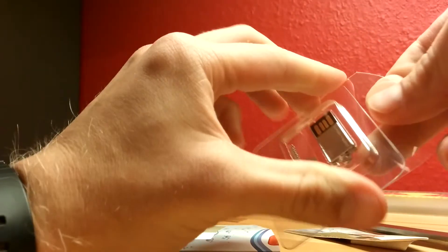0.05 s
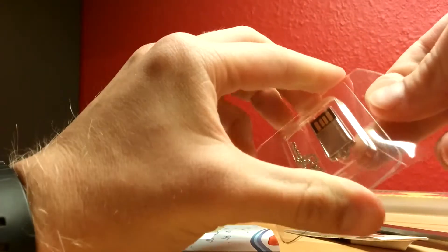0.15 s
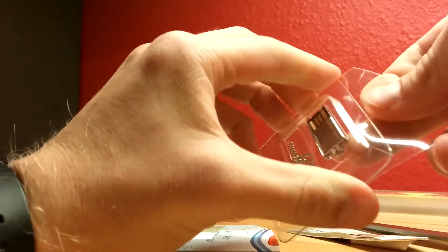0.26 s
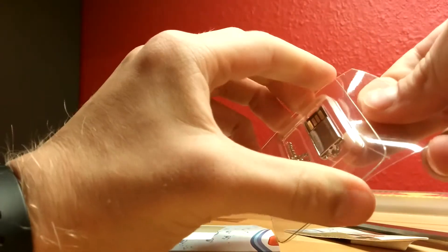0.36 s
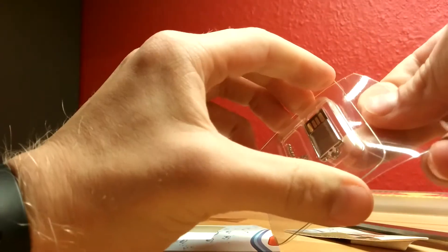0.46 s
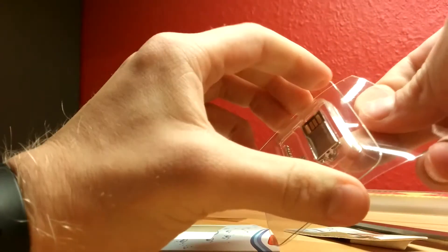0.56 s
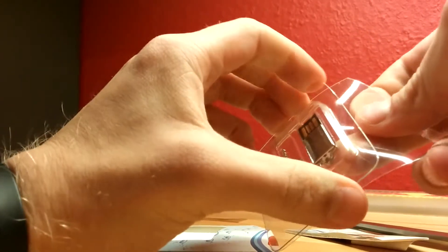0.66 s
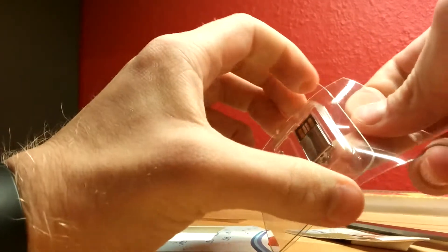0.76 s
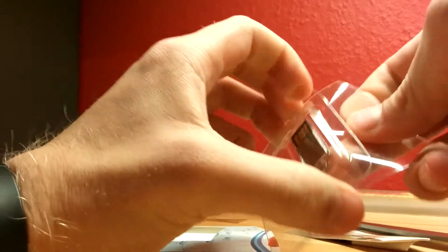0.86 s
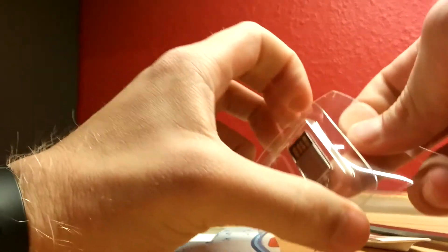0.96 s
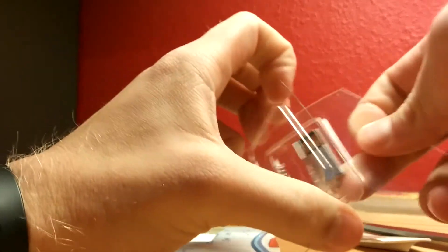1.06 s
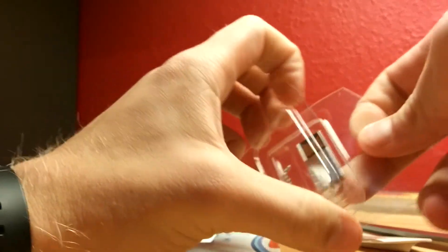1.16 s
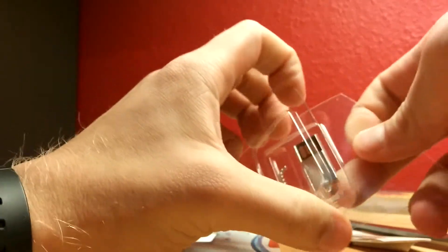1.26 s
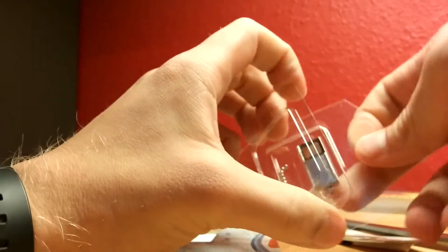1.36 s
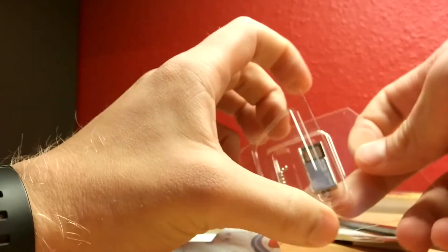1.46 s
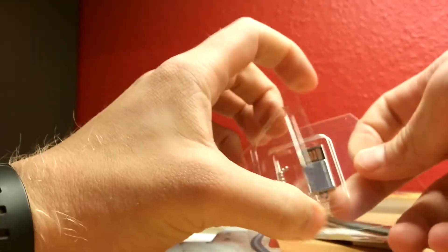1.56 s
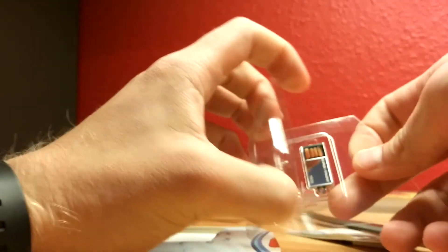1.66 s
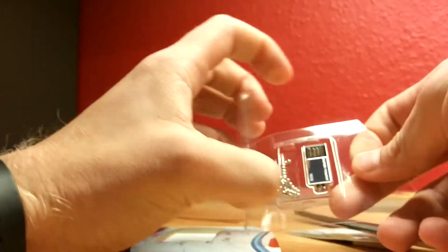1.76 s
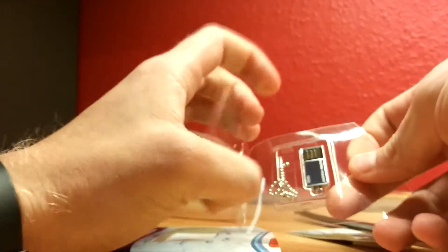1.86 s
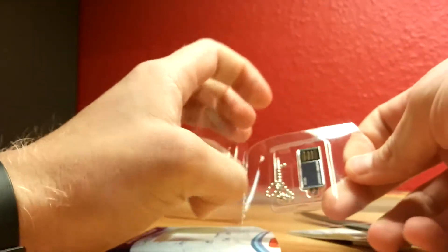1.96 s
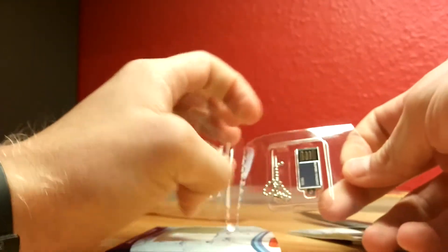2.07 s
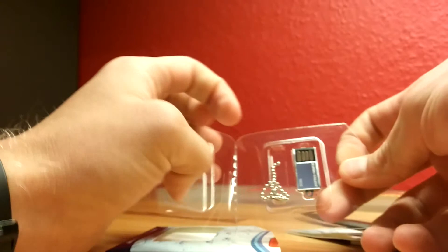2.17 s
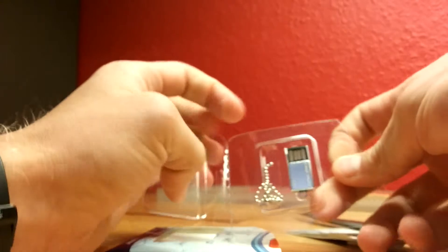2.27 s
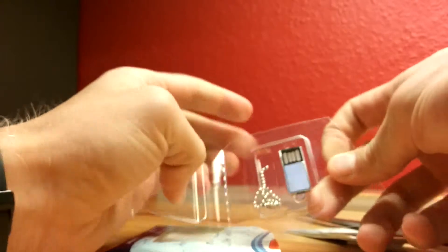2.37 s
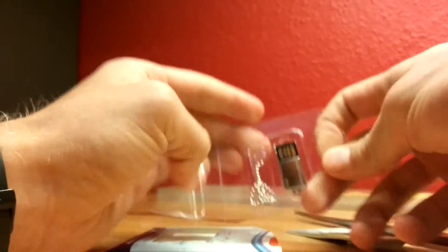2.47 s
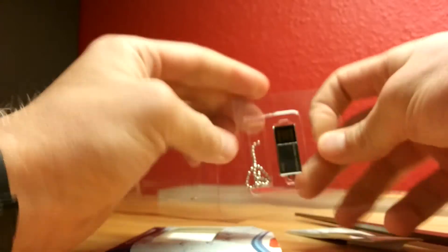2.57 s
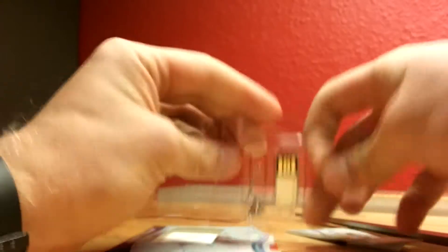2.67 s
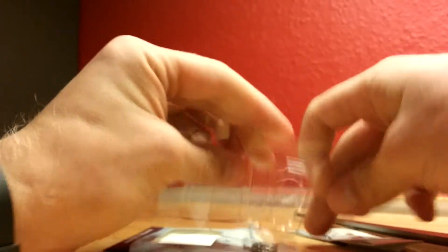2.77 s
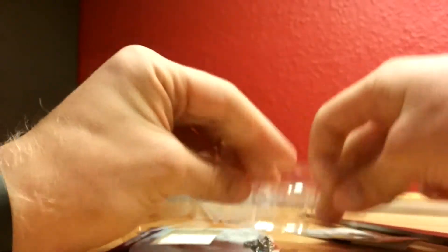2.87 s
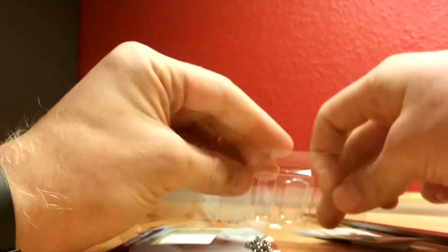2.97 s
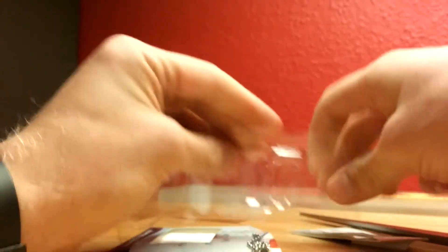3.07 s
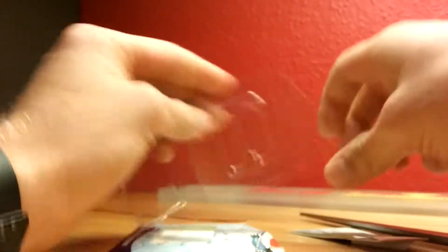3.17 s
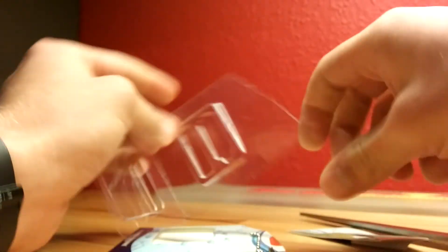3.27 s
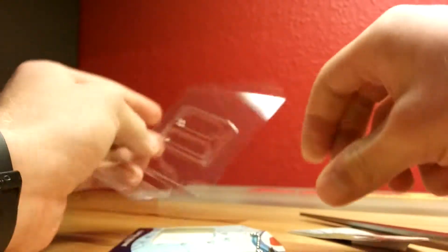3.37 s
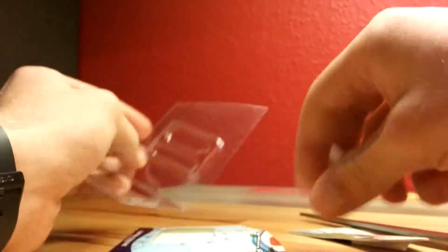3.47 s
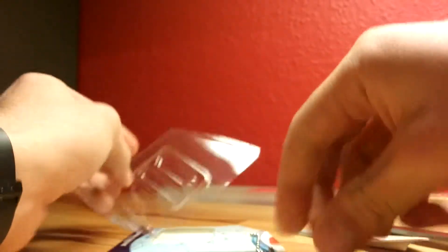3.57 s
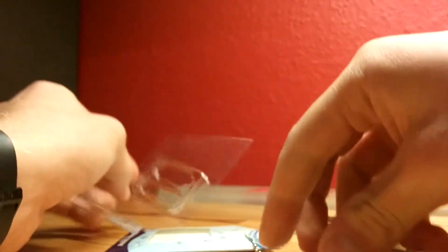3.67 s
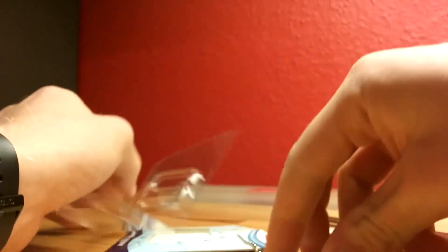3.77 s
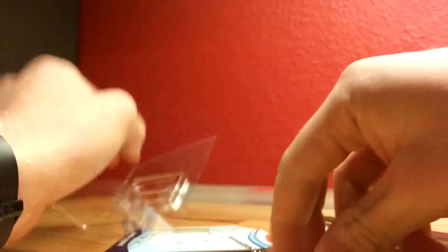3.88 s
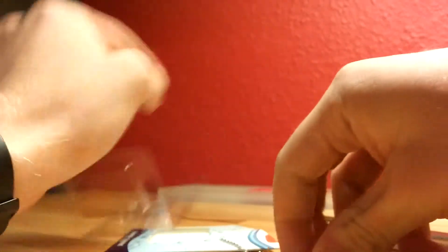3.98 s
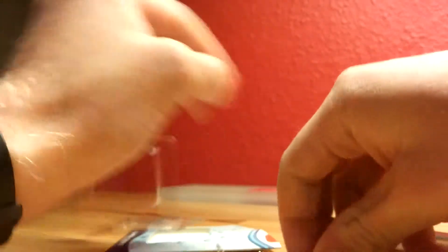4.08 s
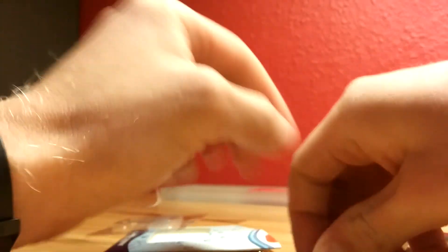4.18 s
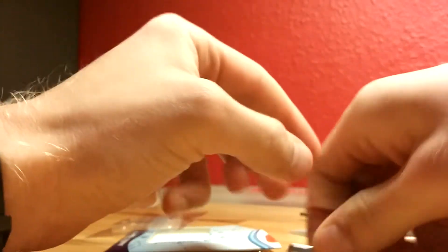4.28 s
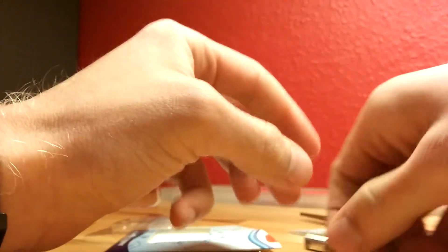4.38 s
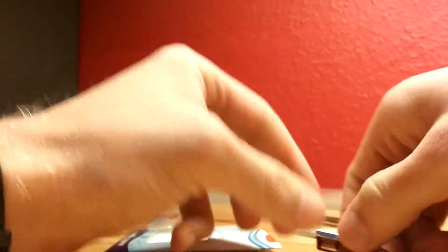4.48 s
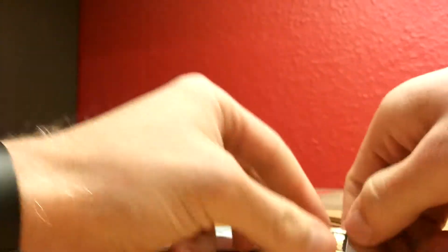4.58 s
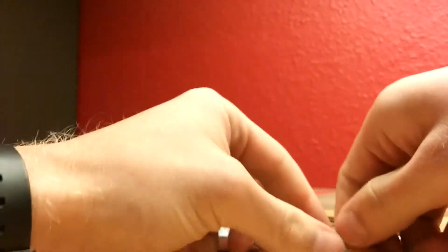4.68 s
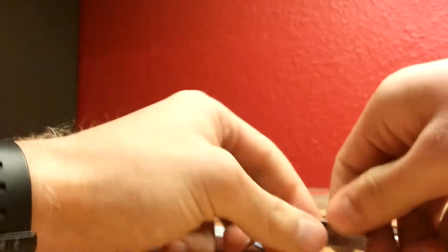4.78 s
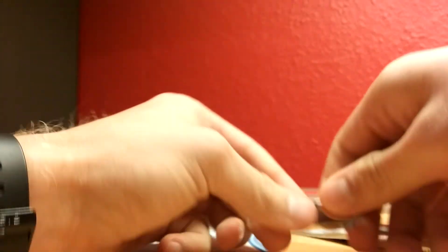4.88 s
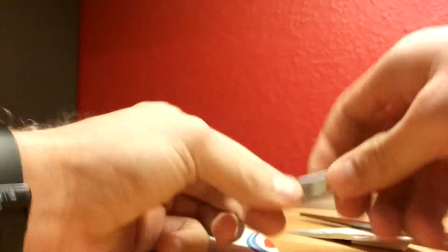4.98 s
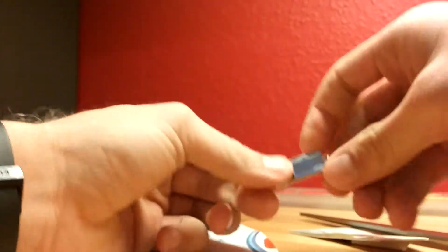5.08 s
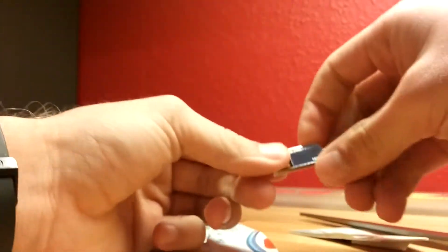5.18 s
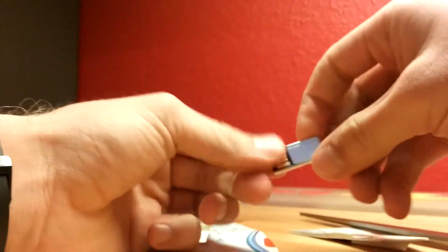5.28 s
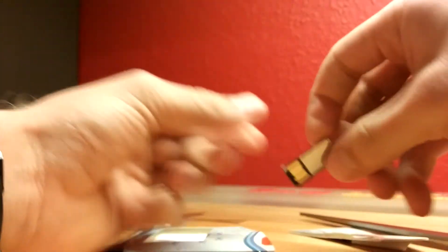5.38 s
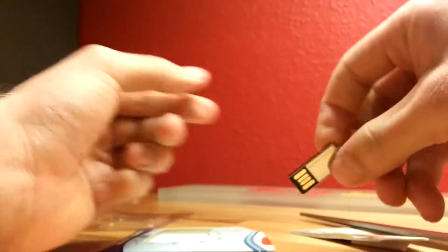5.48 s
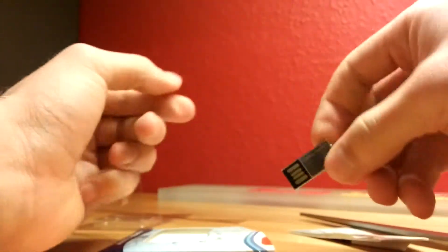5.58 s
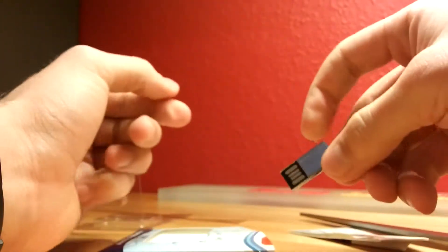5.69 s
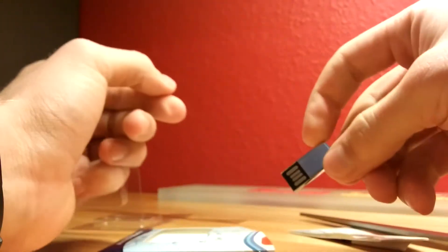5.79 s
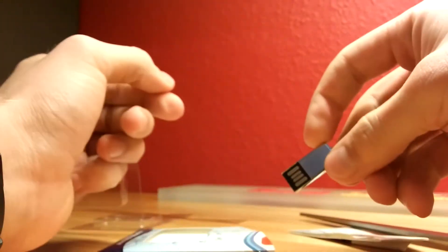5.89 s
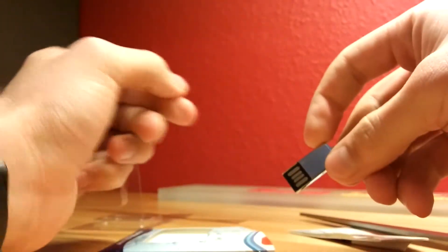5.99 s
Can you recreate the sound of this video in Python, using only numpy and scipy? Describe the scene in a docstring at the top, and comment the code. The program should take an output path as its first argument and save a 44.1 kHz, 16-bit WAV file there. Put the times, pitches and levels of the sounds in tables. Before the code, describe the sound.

Two hands pry open a stiff plastic blister pack at a desk in a small, quiet room. It gives way in separate bursts of sharp snaps and short scrapes, with a few dull knocks on the desk top. Midway comes the loudest, densest crackling, with a hollow ring from the shell. Lighter clicks and scrapes follow, then a pause, one last crackle and a brief, faint low hum. It sounds close, over faint air hiss.

```python
"""At a desk in a small, quiet room, two hands pry open a plastic blister pack, free an object, drop the pack.
The stiff plastic buckles in snaps: runs of tiny clicks that ring one flat patch and the hollow shell.
It scrapes as it sticks and slips, and a few dull knocks set the desk top ringing.
Behind it all is a faint hiss of air, and a low hum that swells once near the end."""
import sys
import numpy as np
from scipy import signal
from scipy.fft import rfft, irfft
from scipy.io import wavfile

SR = 44100
rng = np.random.default_rng(int(sys.argv[2]) if len(sys.argv) > 2 else 0)


def int16_out(signal):
    """Quantize to a 16-bit WAV file."""
    q = np.round(np.clip(np.atleast_2d(signal).T, -1, 1) * 32767)
    wavfile.write(sys.argv[1], SR, q.astype(np.int16))


N = 266229


def gain(db):
    """Turn decibels into a number to multiply by."""
    return 10 ** (np.asarray(db) / 20)


def unit(x):
    """Scale a sound so that its total energy is 1."""
    return x / np.sqrt(np.sum(x ** 2) + 1e-18)


def level_curve(points):
    """Join (time [s], level [dB]) points with straight lines."""
    times, levels_db = np.transpose(points)
    return np.interp(np.arange(N) / SR, times, levels_db)


def fade(t, t60):
    """Die away by 60 dB every t60 seconds."""
    return np.exp(-np.log(1000) * t / t60)


def add(out, start_s, x):
    """Mix x into out from the given time on."""
    i = max(int(start_s * SR), 0)
    out[i:i + len(x)] += x[:max(len(out) - i, 0)]


def colour(x, points, size=2048):
    """Shape the bass and treble along (frequency [Hz], level [dB]) points."""
    hz, db = np.transpose(points)
    grid_hz = np.maximum(np.arange(size // 2 + 1) * SR / size, 1)
    gains = gain(np.interp(np.log(grid_hz), np.log(hz), db))
    # folding the cepstrum makes a filter that rings only after a click, never before it
    cepstrum = irfft(np.log(gains))
    cepstrum[1:size // 2] *= 2
    cepstrum[size // 2 + 1:] = 0
    response = irfft(np.exp(rfft(cepstrum)))
    return signal.fftconvolve(x, response)[:len(x)]


def resonance(x, hz, width_hz):
    """Keep the sound near one pitch; a narrower band rings longer."""
    return signal.lfilter(*signal.iirpeak(min(hz, SR * .45), hz / width_hz, fs=SR), x)


def noise(points):
    """Steady noise with an average power of 1, shaped as in colour()."""
    return unit(colour(rng.standard_normal(N), points)) * np.sqrt(N)


# the tone of the room's air: (frequency [Hz], relative level [dB])
AIR_TONE = [(15, -39.5), (25, -7.5), (102, -5), (134, -9.5), (363, -15), (516, -14), (988, -18),
            (1100, -19), (2910, -20), (16000, -25)]


def air(level_db=-72):
    """The faint, steady rumble and hiss of a quiet room."""
    return gain(level_db) * noise(AIR_TONE)


# how the hum rises and falls: (time [s], level [dB])
HUM_SWELL = [(4.9, -85), (5.3, -78), (5.74, -68.5), (5.81, -54.5), (5.86, -46.5), (5.895, -55.5),
             (5.925, -78)]


def hum(pitch_hz=100, hiss_db=-9):
    """A low tone and a soft hiss swell together."""
    tone = np.sqrt(2) * np.sin(2 * np.pi * pitch_hz * np.arange(N) / SR)
    hiss = noise([(25, 0), (60, 17.5), (200, 13), (500, 6), (2000, -0.5), (10000, -4), (16000, -5.5)])
    return gain(level_curve(HUM_SWELL)) * (tone + gain(hiss_db) * hiss)


def room(x, echo_db=-16, first_echo_s=0.0081, t60=0.12, size=8000):
    """Add quick echoes from the desk and the near wall."""
    t = np.arange(size) / SR
    echoes = unit(rng.standard_normal(size) * fade(t, t60) * (t > first_echo_s))
    echoes = colour(echoes, [(100, 2), (700, -3), (4000, 1.5), (15000, -2)])
    return x + gain(echo_db) * signal.fftconvolve(x, echoes)[:N]


# the notes the desk top rings at: (pitch [Hz], relative level [dB], time to fade by 60 dB [s])
DESK_NOTES = [(57.1, -19, 0.12), (88, -22, 0.12), (173, -21.5, 0.13), (226, -9.5, 0.037), (290, 3, 0.029),
              (371.2, 1.5, 0.036), (429, -5.5, 0.12), (533, -6, 0.2), (720, -11, .03)]
# hand and pack bumping the desk: (time [s], relative level [dB], contact time [s])
DESK_KNOCKS = [(1.127, -19, 0.0024), (1.928, -16, 0.0027), (2.263, -22.5, 0.0018), (2.774, -28.5, 0.0023),
               (2.887, -14.5, 0.00074), (3.3175, -15.5, 0.00062), (3.416, -21, 0.0023),
               (4.704, -51.5, 0.003)]


def desk_knocks(level_db=-5, size=8000):
    """Soft pushes ring the desk top; a longer contact sounds duller."""
    out, t = np.zeros(N), np.arange(size) / SR
    ring = sum(gain(db) * np.sin(2 * np.pi * hz * t) * fade(t, t60) for hz, db, t60 in DESK_NOTES)
    for start_s, db, contact_s in DESK_KNOCKS:
        push = np.sin(np.pi * np.minimum(t / contact_s, 1))
        knock = signal.fftconvolve(ring, push / push.sum())[:size]
        add(out, start_s, gain(db + level_db) * knock)
    return out


# the notes the hollow shell rings at: (pitch [Hz], band width [Hz], relative level [dB])
SHELL_NOTES = [(306, 12, 10), (485, 41, 6), (678.5, 18, 9), (1020, 17, -5.5), (1210, 18, -2.5),
               (1364, 45, -3), (1960, 38, -1), (2770, 150, -9.5), (3330, 260, -5), (4050, 570, -7.5),
               (4600, 320, -6), (5200, 170, -14.5)]
# how freely it rings; fingers muffle it until the halves part: (time [s], level [dB])
SHELL_FREEDOM = [(2.75, -27), (2.9, 0), (3.02, 1), (3.14, -2.5), (3.24, -19.5)]


def shell(x, opens_s=1.5, taut_db=-1):
    """The tight, closed pack rings high; the hollow shell adds its notes as far as the fingers let it."""
    closed = np.arange(N) / SR < opens_s
    taut_ring = gain(taut_db) * resonance(x * closed, hz=3290, width_hz=100)
    shaking = x * gain(level_curve(SHELL_FREEDOM))
    hollow_ring = sum(gain(db) * resonance(shaking, hz, width) for hz, width, db in SHELL_NOTES)
    return x + taut_ring + hollow_ring


def clicks(length, per_second, spread_db):
    """Tiny slips of the plastic at random moments, up or down, most of them small."""
    chance, size, sign = rng.random((length, 3)).T
    strength = np.minimum(-np.log(1 - size), 3.5)
    return (chance < per_second / SR) * gain(spread_db * strength) * np.sign(sign - .5)


def sheet(hits, t60, tick_db, ring_db, size=2500):
    """In the sheet, each click becomes a sharp tick, a noisy scatter of ripples and a shared ring."""
    energy_kept = fade(1 / SR, t60) ** 2  # from one sample to the next
    energy = signal.lfilter([1 - energy_kept], [1, -energy_kept], hits ** 2)
    scatter = np.sqrt(energy) * rng.standard_normal(len(hits))
    fold_ring = unit(rng.standard_normal(size) * fade(np.arange(size) / SR, t60))
    ring = signal.fftconvolve(hits, fold_ring)[:len(hits)]
    return unit(gain(tick_db) * hits + scatter + gain(ring_db) * ring)


def stroke(t, length_s, change_db, rise_db_per_s=1399.5, fall_db_per_s=478):
    """One slide builds quickly, holds while its level drifts, then cuts off fast."""
    drift_db = change_db * (np.clip(t / max(length_s, 1 / SR), 0, 1) - .5)
    rise_db = rise_db_per_s * np.maximum(-t, 0)
    fall_db = fall_db_per_s * np.maximum(t - length_s, 0)
    return gain(drift_db - rise_db - fall_db)


# plastic sliding on plastic and skin; body is the low part of the sound, sizzle the high part:
# (time [s], length [s], relative level [dB], level drift [dB], extra body [dB], extra sizzle [dB])
PLASTIC_SLIDES = [(0.0, 0.018, -42.5, -1, 1.5, -2.5), (0.078, 0.058, -34, 2.5, 1.5, -4),
                  (1.11, 0.067, -19.5, -5, -4.5, -1), (1.213, 0.023, -33, 3, 2, -1.5),
                  (1.29, 0.0085, -47, -6, 9, 0), (1.657, 0.04, -42, 11, 11.5, -6.5),
                  (1.724, 0.1, -48, 8, 12.5, -5.5), (1.874, 0.093, -31.5, 6, 11, -11.5),
                  (1.993, 0.099, -42.5, -14, 12, -10.5), (2.206, 0.12, -37.5, 8.5, 8, -2),
                  (2.444, 0.052, -46.5, -1.5, 10.5, -9.5), (2.566, 0.03, -43.5, 3.5, 5.5, -7),
                  (2.667, 0.048, -27, -4.5, 7.5, -10.5), (2.749, 0.071, -27, 4.5, 9, -8),
                  (2.852, 0.17, -19, -3, 2.5, -4.5), (2.994, 0.19, -26.5, -2.5, 8, -12),
                  (3.228, 0.057, -22.5, -5, -0.5, -8.5), (3.309, 0.13, -34.5, 3.5, 7.5, -5),
                  (3.698, .1, -34.5, 1, 1.5, -6), (3.871, 0.062, -51, 9, 4.5, -9),
                  (3.955, 0.073, -33, 8, 10, -12), (4.057, 0.064, -39.5, -2, 5.5, -10.5),
                  (4.127, 0.064, -28.5, 2.5, 0, -9.5), (5.492, 0.012, -43, 2, 7.5, -1),
                  (5.529, 0.078, -34.5, -3, 1.5, -5.5)]


def sliding_forces(gate_db=-68, size=22000):
    """How hard the strongest slide shakes the edges, body and creases at each moment."""
    forces = np.zeros((3, N))
    for start_s, length_s, db, change_db, body_db, sizzle_db in PLASTIC_SLIDES:
        start = int(start_s * SR)
        span = np.arange(max(start - size // 10, 0), min(start + size, N))
        # the faintest scraping is gated to silence
        slip = gain(db) * stroke(span / SR - start_s, length_s, change_db) - gain(gate_db)
        forces[:, span] = np.maximum(forces[:, span], gain([[0], [body_db], [sizzle_db]]) * slip)
    return forces


def scraping(level_db=-3):
    """Sliding plastic sticks and slips, making a stream of tiny clicks that each ring briefly."""
    coarse = unit(clicks(N, per_second=560, spread_db=2.5))
    fine = unit(clicks(N, per_second=13000, spread_db=3.5))
    # the same slips shake the pack's edges, its whole body and its finest creases
    edge, body, sizzle = (force * np.sqrt(N) * sheet(coarse + fine, 0.0046, tick_db=-8.5, ring_db=-10.5)
                          for force in sliding_forces())
    body = colour(body, [(22, -11), (50, 8.5), (120, -0.5), (180, 2), (450, -1), (1300, 0),
                         (2400, -6), (5000, -28.5), (12000, -39.5)])
    edge = colour(edge, [(400, -21), (1400, -1), (2200, 0), (4500, 5.5), (6200, -7.5),
                         (10000, -23.5), (16000, -39.5)])
    sizzle = colour(sizzle, [(1500, -30.5), (4500, -8.5), (7000, 5.5), (11000, 1), (16000, -6.5)])
    return gain(level_db) * (body + edge + sizzle)


def snap(run_s, thud_db, body_db, sizzle_db, patch_hz, first_db=5, brief_s=0.0033, patch_db=8, size=3000):
    """A crease gives way in a run of clicks, which ring the flat patch of plastic that flipped."""
    t = np.arange(size) / SR
    # a long run starts at once, swells and stops; a brief one is mostly its first click
    progress = t / (1.2 * run_s + 0.00068)
    swell = (progress < 1) * (1 + np.sin(np.pi * progress) / 2)
    crease = unit(clicks(size, per_second=3000, spread_db=0.5) * swell)
    crease[0] += gain(first_db) * np.exp(-run_s / brief_s)
    crack = sheet(crease, t60=0.043, tick_db=2.5, ring_db=3)
    patch_gain = gain(patch_db) * (3500 / patch_hz) ** 0.19  # big, low patches sound loudest
    patch_ring = patch_gain * resonance(crack, patch_hz, width_hz=70 + patch_hz / 22)
    tone = [(25, thud_db - 19.5), (60, thud_db - 4), (200, thud_db - 5),
            (1100, body_db - 0.5), (2200, -2.03), (5200, -3), (6400, sizzle_db / 2 - 4.5),
            (8000, sizzle_db + 0.5), (11500, sizzle_db + 2), (16000, sizzle_db - 11)]
    return colour(crack + patch_ring, tone)


# the snaps of the bending pack: (time [s], rough length of the click run [s], relative level [dB],
# extra body [dB], extra sizzle [dB], pitch of the patch [Hz])
PLASTIC_SNAPS = [(0.053, 0.0089, 1.5, 1, -9, 3180), (0.0778, 0.0022, 16.5, 0, -2.5, 3420),
                 (0.111, 0.011, 2, -7, -5.5, 3380), (0.243, 0.0037, -28, 4, -10, 2800),
                 (1.101, 0.0032, 19, -8, -5.5, 3400), (1.1083, 0.002, 12.5, -16.5, -15.5, 3400),
                 (1.125, .0045, 10.5, 4.5, -13, 3250), (1.151, 0, 7, -10.5, 2, 3230),
                 (1.1656, 0.00076, 12.5, -35, -7, 2790), (1.194, 0.0044, 11, 1, -7, 2610),
                 (1.212, 0, 8.5, -12, -3, 9200), (0.474, 0.00077, -31.5, 0, -14, 2510),
                 (1.358, 0.0035, -29.5, -11, -6, 3400), (1.448, 0.001, -11.5, -14, -0.5, 3500),
                 (1.454, 0.0065, -4, -5, -2.5, 3760), (1.562, 0.017, -15.5, 5.5, -9, 4010),
                 (1.692, 0.0021, 0.5, -5, -21, 1250), (1.789, 0.0027, 1.5, 1, -18.5, 1710),
                 (1.808, 0.0091, 2, -1.5, -14, 1420), (2.198, 0.0077, 0, 1.5, -8, 4580),
                 (2.213, 0.0046, 12, -10.5, -4.5, 4380), (2.2639, 0.0012, 6.5, 2, -16, 1360),
                 (2.305, 0.0091, 3.5, 9, -2, 3360), (2.312, 0, 8.5, -0.5, -12.5, 1030),
                 (2.565, 0.0034, -14, 8, -8, 3620), (2.588, 0.0013, -4.5, -19, -4.5, 3400),
                 (2.667, 0.00048, 7, 1, -27, 1480), (2.778, 0.0065, 8, 1.5, -7, 2800),
                 (2.796, 0.0076, 17, -0.5, -1.5, 1160), (2.833, 0.0078, 21.5, -14.5, -8.5, 4160),
                 (2.8584, 0.012, 25, -10.5, -4.5, 4700), (2.881, 0.013, 25, 4.5, -8, 3900),
                 (2.907, 0.012, 23, 2, -4, 1193), (2.965, 0.0056, 23.5, 3.5, -5.5, 4300),
                 (2.99, 0.00035, 21.5, -2.5, -9.5, 4250), (3.0235, 0.0027, 21, 1.5, -8, 720),
                 (3.064, 0.00053, 16.5, 4, -15, 640), (3.093, .008, 14, 5.5, -14, 2400),
                 (3.1221, 0.00022, 11.5, 5.5, -20, 2390), (3.143, .003, 3, 7, -10.5, 680),
                 (3.211, 0.0073, 7, -2, -25, 3930), (3.258, 0, 4.5, 4, -2, 4540),
                 (3.273, 0.00089, 4.5, -24, -6, 4660), (3.2995, .003, 7.5, -8, -15.5, 4230),
                 (3.367, 0.01, 5, -49, -11.5, 4540), (3.413, 0.0039, 10.5, 4, -5.5, 1900),
                 (3.685, 0.0044, 2.5, 0, -9.5, 4820), (3.727, 0.0068, 14, -26, -7, 4390),
                 (3.966, 0.011, 1.5, -3, -17.5, 640), (4.122, 0.0035, 7.5, -5.5, -12.5, 2510),
                 (4.269, 0.0068, -16.5, -5, -10, 700), (4.312, .005, -28, -1, -12, 3820),
                 (5.483, 0.0088, -4.5, -4.5, -9.5, 1900), (5.535, 0.0036, 4.5, 0.5, -10, 2700)]


def buckling(level_db=-2):
    """The stiff pack gives way, one snap after another."""
    out = np.zeros(N)
    for start_s, run_s, db, body_db, sizzle_db, patch_hz in PLASTIC_SNAPS:
        # a snap that moves the whole pack thuds more; a loud one has a smaller share of thud
        thud_db = -0.5 + 0.4 * body_db - 0.23 * db
        add(out, start_s, gain(db + level_db) * snap(run_s, thud_db, body_db, sizzle_db, patch_hz))
    return out


def scene():
    """The pack and the desk sound in the room, over the air and the hum, in one channel."""
    pack = shell(buckling() + scraping())
    return (room(pack + desk_knocks()) + air() + hum())[None]


def record(dry, bottom_hz=37, top_hz=16200):
    """Drop the deepest rumble, round off the loudest peaks and cut the highest treble."""
    no_rumble = signal.sosfilt(signal.butter(8, bottom_hz, "high", fs=SR, output="sos"), dry)
    rounded = 1.117 * np.tanh(no_rumble / 1.214)
    return signal.sosfilt(signal.ellip(10, .2, 70, top_hz, fs=SR, output="sos"), rounded)


dry = scene()
out = record(dry)
int16_out(out)
```